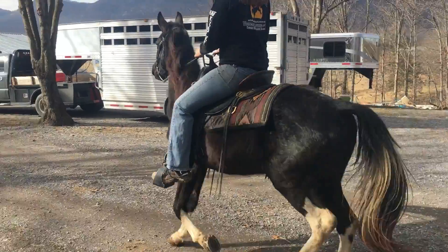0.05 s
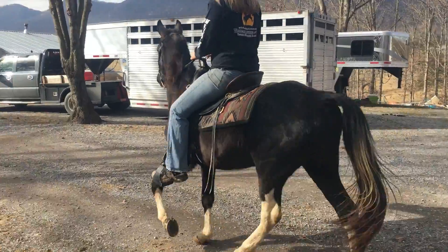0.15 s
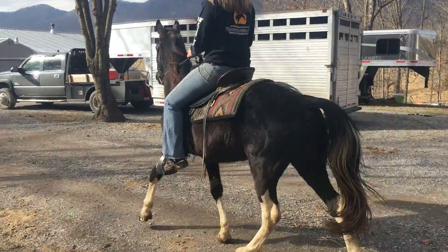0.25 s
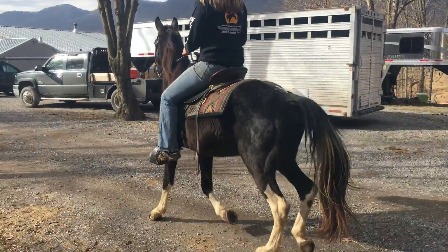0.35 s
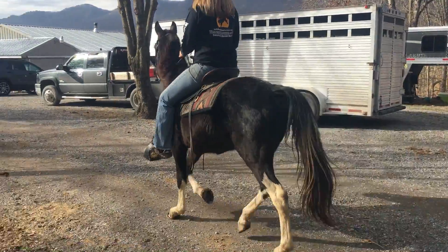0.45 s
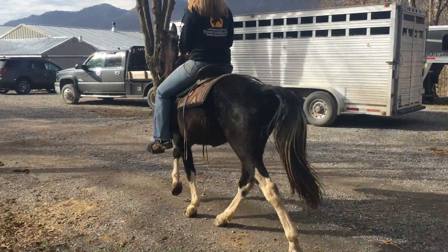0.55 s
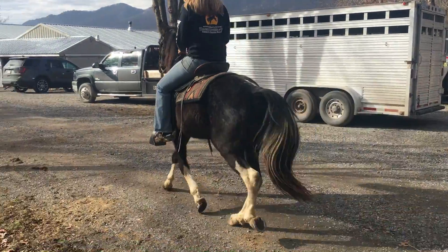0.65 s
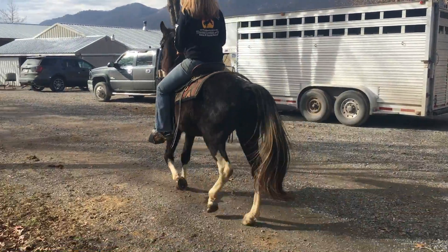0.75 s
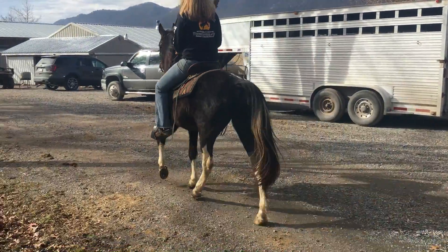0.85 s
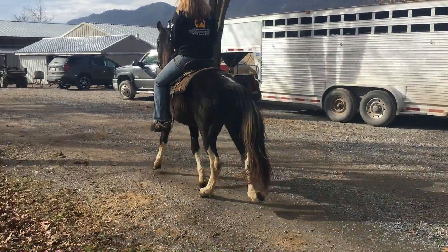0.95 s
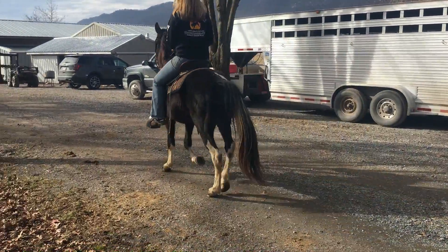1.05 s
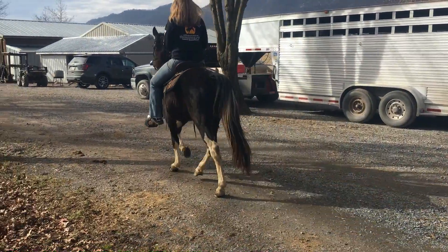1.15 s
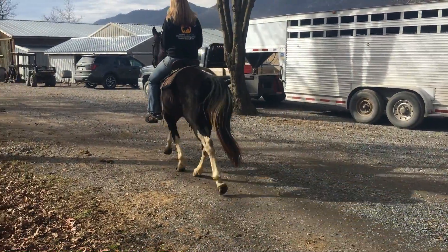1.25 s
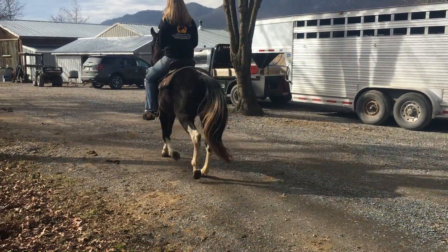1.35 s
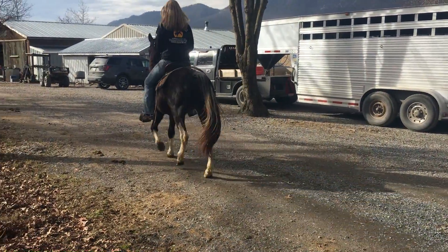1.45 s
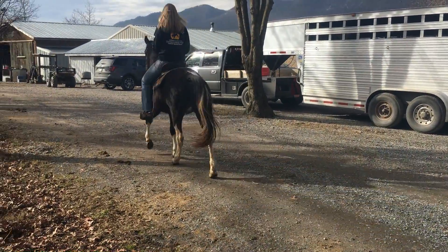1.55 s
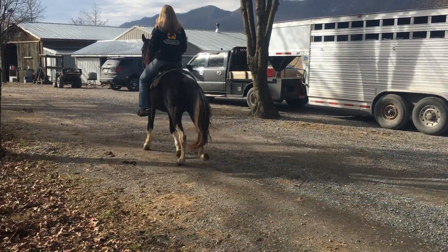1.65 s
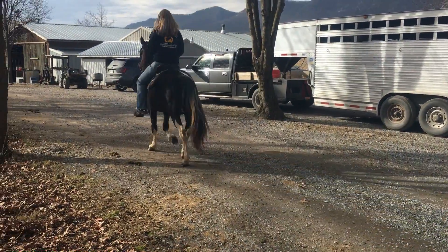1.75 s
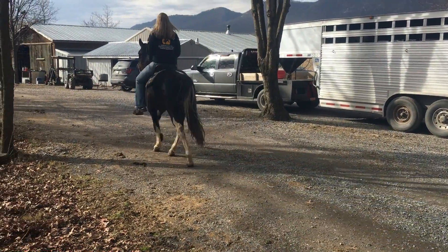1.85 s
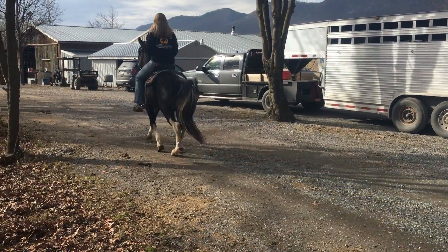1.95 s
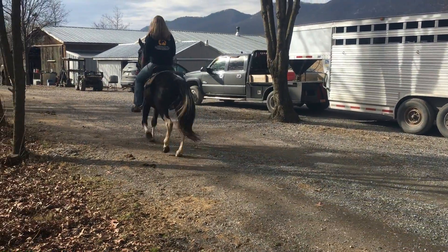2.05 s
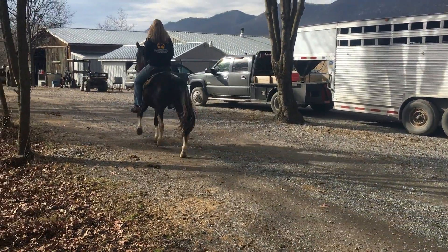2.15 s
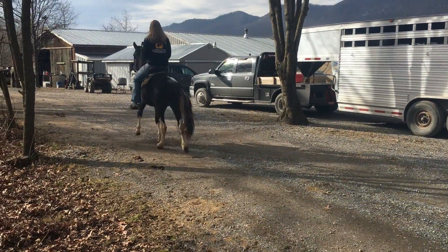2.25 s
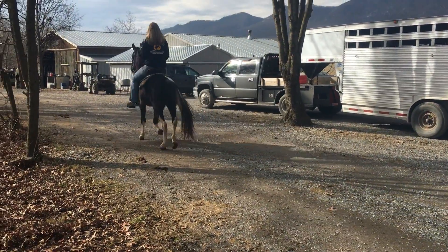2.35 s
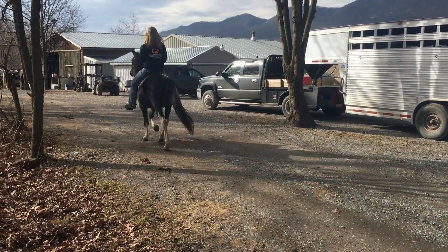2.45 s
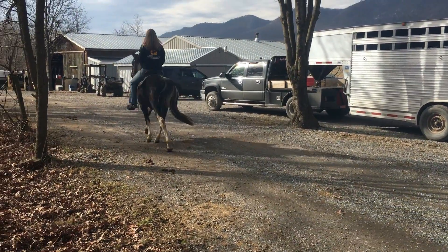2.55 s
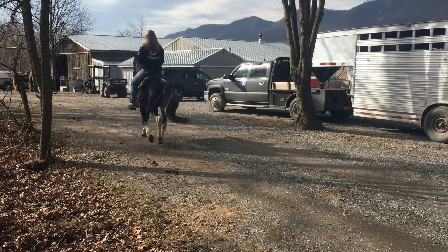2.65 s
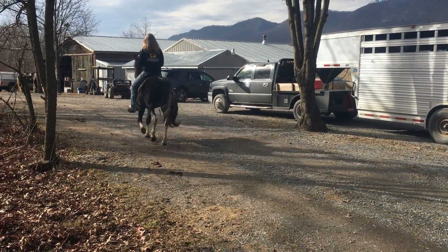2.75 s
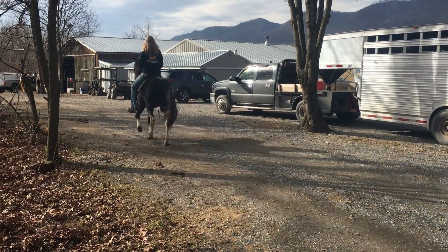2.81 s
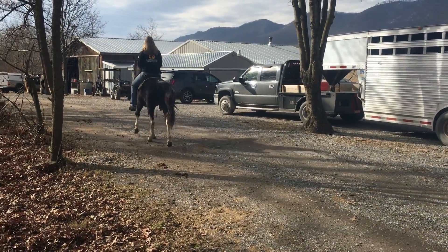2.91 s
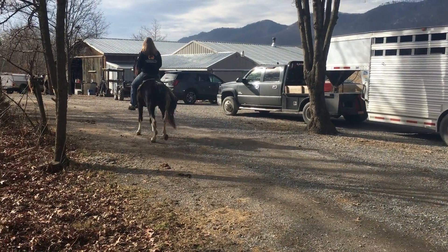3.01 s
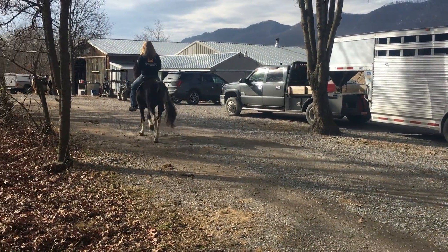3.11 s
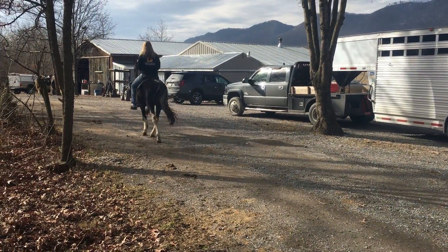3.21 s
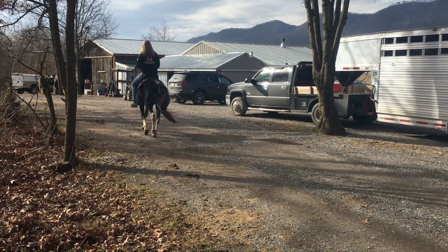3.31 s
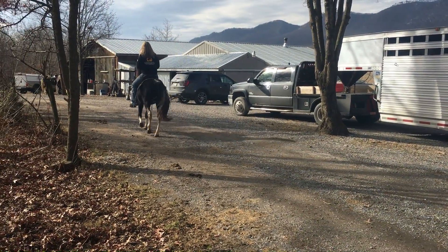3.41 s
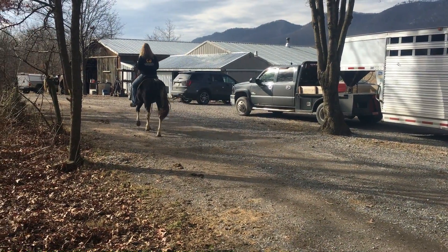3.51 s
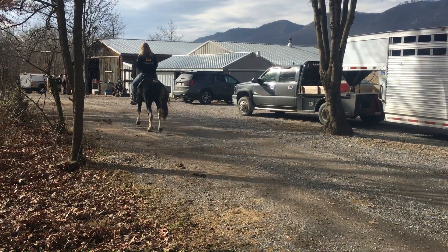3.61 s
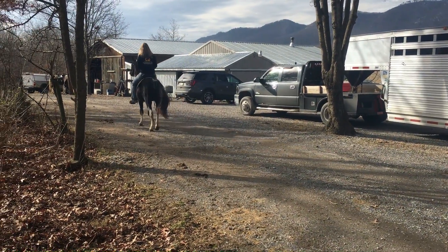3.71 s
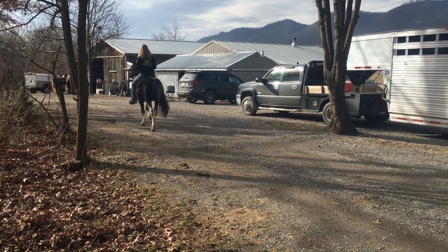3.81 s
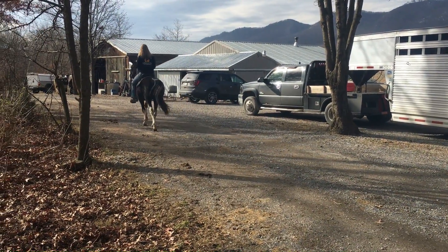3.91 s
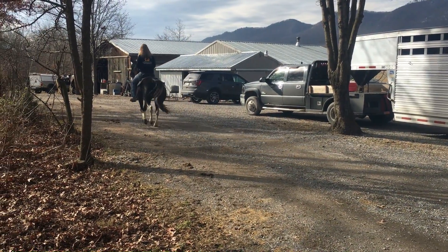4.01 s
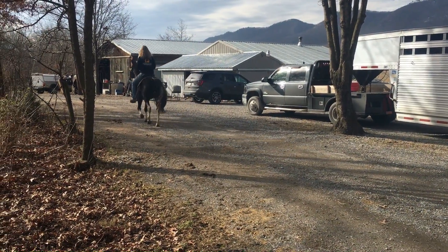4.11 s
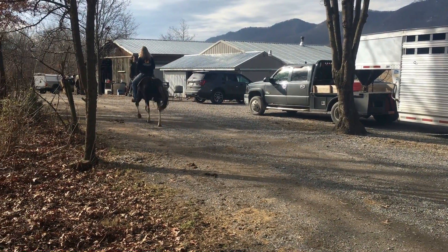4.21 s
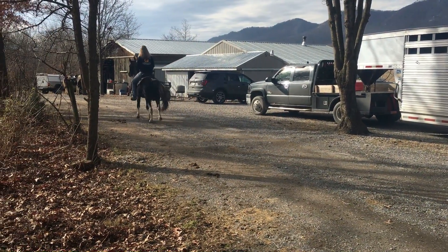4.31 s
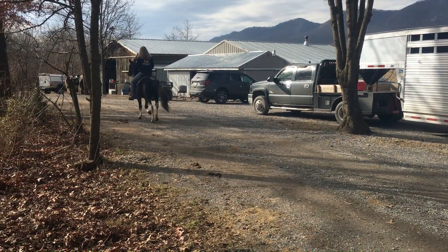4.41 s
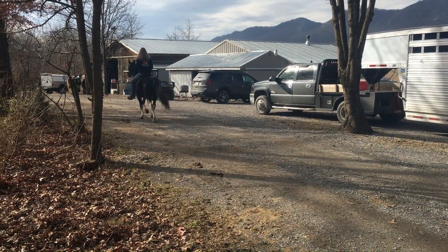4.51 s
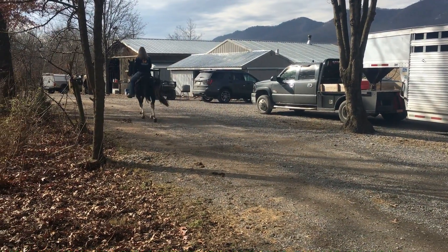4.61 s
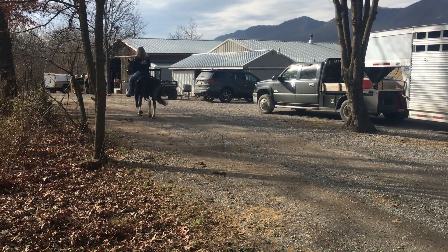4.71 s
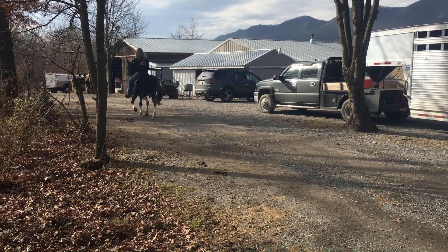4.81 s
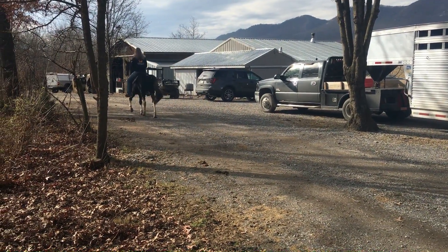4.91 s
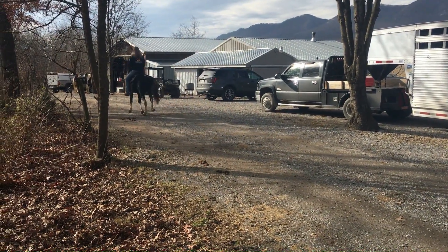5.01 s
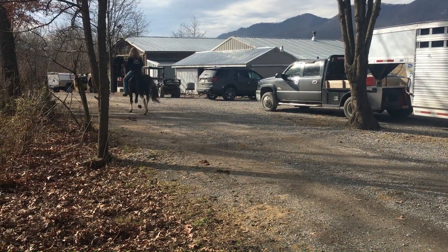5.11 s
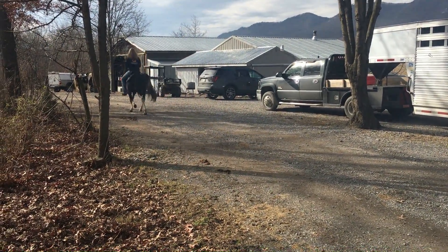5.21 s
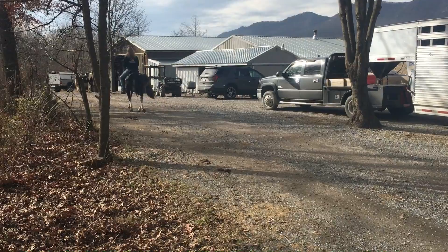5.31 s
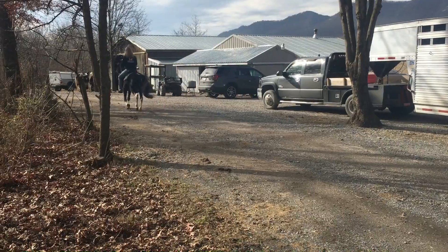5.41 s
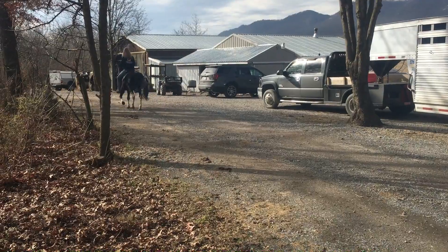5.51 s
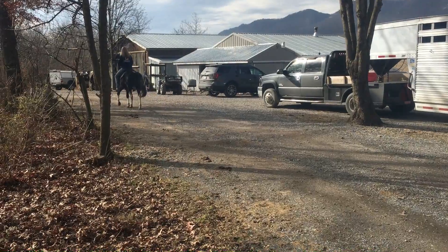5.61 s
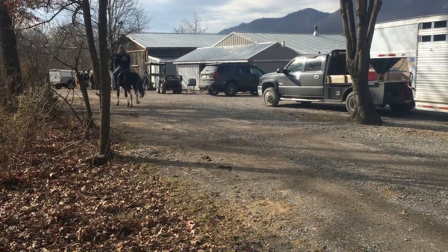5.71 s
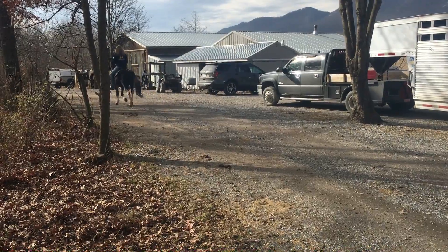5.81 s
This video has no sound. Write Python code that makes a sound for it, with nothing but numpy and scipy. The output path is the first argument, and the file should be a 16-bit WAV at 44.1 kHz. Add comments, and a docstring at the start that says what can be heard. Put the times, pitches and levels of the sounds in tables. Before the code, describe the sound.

Rapid hoof crunches on loose stones begin right beside a small stationary microphone, crisp and full of clicks and grit. Over about six seconds the horse moves off, its steps still brisk but fainter, with the treble dulled and a short scattered outdoor echo more noticeable. Some single stones still knock sharply midway. Soft airy wash and low rumble lie beneath throughout.

```python
"""A horse's hooves crush gravel as it gaits away across a yard, heard on a small microphone.
Each crunch is a dense train of stone contacts under the load of a hoof; single stones knock, snap
and tick, grit patters after them, lone specks tick thinly and the ground gives soft low thuds.
With distance the body rises in pitch and the treble dulls, while the short echo of sheds and a
trailer, made of sparse taps, gains. A noise bed of hiss, wash and low rumble lies under it all."""
import sys
import numpy as np
from scipy import signal
from scipy.io import wavfile
from scipy.ndimage import uniform_filter1d

SR = 44100
rng = np.random.default_rng(int(sys.argv[2]) if len(sys.argv) > 2 else 0)


def log_audio(samples):
    """Write samples as a 16-bit WAV file to the path given in sys.argv[1]."""
    # one column per channel
    frames = np.atleast_2d(samples).T
    # limit to full scale, then quantise
    limited = np.clip(frames, -1, 1)
    pcm = np.round(limited * 32767).astype(np.int16)
    wavfile.write(sys.argv[1], SR, pcm)


N = 258426
T = np.arange(N) / SR

# hooves crushing or dragging gravel: start_s, length_s, body_level_db, fizz_level_db
CRUNCHES = [(0.009, 0.049, -33.5, -45), (0.154, 0.023, -37.5, -50), (0.183, 0.062, -48.5, -62),
            (0.236, 0.014, -41.5, -55), (0.357, 0.034, -35.5, -44), (0.429, 0.044, -44, -59),
            (0.488, 0.0095, -29.5, -44.5), (0.528, 0.017, -58, -66), (0.592, 0.009, -54, -55),
            (0.688, 0.039, -31.5, -46), (0.768, 0.011, -47, -52), (0.819, 0.017, -40.5, -51),
            (1.032, 0.035, -40, -49), (1.113, 0.022, -44, -63), (1.152, 0.0092, -48, -69),
            (1.199, 0.017, -39, -59), (1.354, 0.043, -37, -54), (1.43, 0.037, -47, -58.5),
            (1.502, 0.016, -41.5, -52.5), (1.577, 0.015, -53.5, -73), (1.685, 0.043, -39, -51),
            (1.825, 0.016, -44, -54), (1.85, 0.0093, -47, -65), (2.015, 0.054, -40, -53.5),
            (2.103, 0.02, -42.5, -58.5), (2.139, 0.029, -43.5, -62), (2.181, 0.026, -46, -66),
            (2.26, 0.051, -57.5, -73), (2.361, 0.051, -44.5, -54.5), (2.419, 0.028, -44, -54.5),
            (2.507, 0.045, -44, -67.5), (2.681, 0.072, -43.5, -56.5), (2.762, 0.041, -56, -55),
            (2.795, 0.018, -48, -53), (2.819, 0.08, -43, -58), (3.06, 0.043, -41, -51),
            (3.112, 0.062, -49.5, -63.5), (3.17, 0.06, -43.5, -59.5), (3.374, 0.051, -41.5, -52.5),
            (3.511, 0.028, -40, -56.5), (3.722, 0.031, -40.5, -54), (3.806, 0.01, -41, -54),
            (3.849, 0.029, -47.5, -58.5), (4.061, 0.038, -44.5, -62.5), (4.187, 0.048, -49.5, -69.5),
            (4.405, 0.046, -47, -66), (4.474, 0.089, -54, -63), (4.677, 0.031, -64, -72),
            (4.759, 0.051, -47.5, -62), (4.824, 0.048, -56, -69), (4.895, 0.024, -54.5, -71),
            (4.97, 0.012, -52, -62), (5.052, 0.02, -41, -69), (5.077, 0.059, -51.5, -65),
            (5.196, 0.1, -55, -69.5), (5.442, 0.039, -43.5, -62.5), (5.564, 0.033, -50.5, -67),
            (5.795, 0.12, -49.5, -74)]
# the loudest single stones: start_s, knock_peak_db, knock_pitch_hz, snap_peak_db, tick_peak_db
CRACKS = [(0.012, -31, 895, -49, -58), (0.0237, -31, 890, -35, -40), (0.0289, -21.5, 1490, -21, -22),
          (0.0419, -26.5, 680, -17, -28), (0.0482, -21.5, 1690, -14, -35), (0.164, -27, 930, -27.5, -48),
          (0.2042, -31, 1480, -33, -51), (0.2432, -25, 1320, -30.5, -34.5), (0.311, -27.5, 900, -35, -39),
          (0.3611, -29, 1400, -45, -47), (0.3736, -29, 770, -28, -67), (0.3791, -22.5, 930, -30, -50),
          (0.4266, -29, 930, -23.5, -29.5), (0.436, -47, 980, -31, -45), (0.4538, -29, 960, -26.5, -29),
          (0.4895, -18, 900, -20, -31), (0.5274, -31.5, 724, -51, -55), (0.6924, -14.5, 1470, -46, -50),
          (0.6991, -14.5, 1070, -21, -49), (0.711, -28, 845, -34, -48), (0.7274, -41, 1090, -31, -26.5),
          (0.7693, -35, 866, -28, -40), (0.7896, -41, 730, -30, -55), (0.8125, -34, 700, -50, -61),
          (0.829, -33, 830, -31, -41), (0.8807, -38, 890, -34, -62), (0.9005, -36, 900, -40, -59),
          (0.9575, -27.5, 750, -35, -41), (1.036, -24.5, 860, -27, -40), (1.044, -23.5, 870, -35, -46),
          (1.049, -21, 950, -45, -45), (1.0867, -33, 776, -52, -43.5), (1.1628, -31, 740, -45, -39),
          (1.1692, -12.5, 1364, -13, -28.5), (1.207, -27, 865, -25, -34.5), (1.3061, -27, 917, -31.5, -37),
          (1.3643, -18, 740, -19, -33), (1.381, -43, 900, -32, -30), (1.3911, -26, 1710, -22, -27),
          (1.3952, -23.5, 1390, -27, -34), (1.4556, -45, 1300, -29.5, -49),
          (1.5119, -32.5, 1360, -30.5, -45), (1.6993, -26, 915, -33, -39), (1.7082, -27, 880, -44, -30),
          (1.8317, -19.5, 720, -37.5, -56), (2.025, -20, 1020, -41, -38), (2.041, -24, 1800, -34, -33),
          (2.0466, -23.5, 1200, -26, -42), (2.1146, -26.5, 1590, -29, -42), (2.162, -26, 1340, -37, -41),
          (2.1868, -30, 1120, -51, -57), (2.204, -30, 1020, -26.5, -35.5), (2.227, -45, 1070, -38, -44),
          (2.267, -26, 950, -31.5, -39.5), (2.368, -21, 1390, -41, -29.5), (2.3754, -25.5, 1480, -28, -34),
          (2.3939, -25.5, 1440, -46, -32), (2.409, -30.5, 1410, -48, -54), (2.4296, -41, 1280, -27.5, -55),
          (2.5163, -19.5, 1235, -34, -54), (2.677, -29, 1350, -40, -61), (2.6955, -24, 1140, -42, -38),
          (2.6999, -25.5, 1450, -49, -58), (2.7284, -29, 1590, -43, -36), (2.7695, -55, 1070, -44, -53),
          (2.8038, -26.5, 1350, -26.5, -39), (2.835, -29, 1240, -53, -54),
          (2.8563, -16.5, 1590, -18.5, -24), (3.0657, -20.5, 1510, -38, -33),
          (3.072, -17.5, 1570, -26, -30), (3.081, -24, 1310, -36, -35), (3.094, -30, 1560, -44, -50),
          (3.1398, -31.5, 1270, -41, -51), (3.1735, -30, 1420, -33, -42), (3.178, -10.5, 1240, -21.5, -43),
          (3.1917, -22, 1420, -23, -37), (3.2144, -33, 1360, -31, -39), (3.384, -27.5, 1660, -46, -55),
          (3.3983, -22, 1420, -36, -52), (3.4029, -22.5, 1430, -25, -33), (3.4686, -31, 1280, -34.5, -46),
          (3.521, -31, 1200, -30, -56), (3.7264, -26.5, 1210, -25, -35.5),
          (3.7312, -28.5, 1270, -26, -53.5), (3.792, -34, 1190, -34, -52),
          (3.8121, -32.5, 1000, -23.5, -45), (3.8637, -37, 1340, -34, -63), (4.0653, -31, 930, -34, -65),
          (4.437, -37, 1540, -31.5, -59), (4.4794, -31, 1540, -28, -69), (4.4827, -30, 1260, -35, -64),
          (4.4932, -23.5, 1385, -24.5, -64), (4.4995, -35, 1140, -23, -63), (4.5046, -33, 1770, -32, -65),
          (4.5105, -48, 1740, -31, -64), (4.5234, -46, 1400, -23.5, -48), (4.548, -38, 1264, -37, -48),
          (4.637, -57, 1220, -37.5, -63), (4.6808, -31.5, 1470, -27, -66), (4.6965, -38.5, 835, -44, -49),
          (4.768, -37, 1280, -33, -69), (4.7844, -42, 1330, -30, -65), (4.836, -41, 1320, -34.5, -62),
          (4.89, -36, 1300, -35, -65), (4.9441, -50, 1100, -38, -53), (5.039, -26, 1660, -31.5, -65),
          (5.0669, -30, 1720, -34.5, -69), (5.1067, -50, 1600, -29.5, -61), (5.117, -41, 1300, -30, -53),
          (5.2023, -42, 1530, -40.5, -60), (5.2554, -51, 1600, -32, -53), (5.4532, -30, 693, -31, -64),
          (5.474, -34, 1190, -28.5, -67), (5.5785, -24.5, 1175, -34, -64), (5.81, -50, 1630, -37, -67)]
# flung grit against the crunch that throws it, in body, snap and fizz: level_db
GRIT_LEVELS = (-18.5, -17.5, -19)
# lone specks of grit: start_s, peak_db
SPECKS = [(0.075, -48), (0.6776, -55), (1.0734, -41), (1.1303, -48), (2.562, -48), (2.6702, -48),
          (2.9275, -47), (2.9744, -51), (3.0126, -54), (3.243, -49)]
# the ground gives under a hoof: middle_s, peak_db, pitch_hz
THUDS = [(0.033, -43, 180), (0.045, -37, 378), (0.377, -40, 334), (0.494, -50, 354), (0.175, -42, 334),
         (0.378, -37, 217), (0.495, -43, 264), (0.513, -42, 84), (0.53, -45, 230), (0.714, -41, 91),
         (0.72, -32.5, 222), (0.838, -43.5, 117), (0.96, -41.5, 222), (1.049, -41.5, 193),
         (1.177, -45, 151), (1.372, -40, 174), (1.708, -38, 169), (2.047, -49, 312), (2.544, -41.5, 69.5),
         (2.725, -41, 220), (3.192, -44, 129), (3.389, -42, 206), (3.417, -38.5, 210), (4.074, -43, 112),
         (4.714, -40, 99), (4.779, -43, 173), (5.755, -41.5, 110)]
# colour of colliding stones close to the microphone: frequency_hz, level_db
GRAVEL_NEAR = [(180, -36.5), (300, -2.5), (478, -12.5), (1010, 3.5), (1150, -12.5), (1660, -6), (1970, -11),
               (2740, -7), (3130, -2), (3520, -15.5), (4910, -25.5), (6520, -27.5), (8360, -49),
               (9550, -44), (13000, -55), (16000, -71)]
# farther off the ground reflection lifts the body in pitch and the treble dulls: frequency_hz, level_db
GRAVEL_FAR = [(180, -38.5), (300, -21), (418, -20.5), (678, -4.5), (1010, -3.5), (1250, 2.5), (1640, -4.5),
              (2030, -19.5), (2980, -9), (3700, -28), (6200, -35), (8940, -51.5), (16000, -52)]
# the horse moves off: time_s, far_colour_share (0-1)
FARNESS = [(0, 0.01), (1.5, 0.46), (2.5, 0.57), (3.5, 1), (5.86, 0.98)]
# borders of body, snap, fizz and sparkle: frequency_hz
SPLITS_HZ = (2136, 3730, 8300)
# dying away of the yard's echo: frequency_hz, t60_s
ECHO_T60 = [(300, 1), (1200, 0.5), (3000, 0.47), (6000, 0.81), (12000, 0.5)]
# the echo gains on the direct sound with distance: time_s, level_db
ECHO_LEVEL = [(0, -19.5), (3, -16.5), (5.86, -10)]
# colour of the steady background: frequency_hz, relative level_db
AIR_COLOUR = [(15, -75), (25, 10.5), (58, 7), (134, 0.5), (463, -13), (659, -9.5), (1290, -9.5),
              (1700, -12.5), (2110, -18.5), (2690, -24.5), (2990, -9), (4610, -33), (10400, -40),
              (14800, -41), (16000, -52)]
# colour of the low rumble: frequency_hz, relative level_db
RUMBLE_COLOUR = [(20, -5.5), (40, -43), (65, -1.5), (115, -11), (136, 3.5), (155, -7), (200, -4),
                 (300, -19.5), (600, -74)]
# the rumble swells and sags: time_s, level_db
RUMBLE_LEVEL = [(0.0, -53), (0.98, -53), (1.29, -54.5), (2.46, -55), (2.58, -53), (3.51, -54.5),
                (4.02, -58), (5.86, -59)]

SNAP_SHARE, SNAP_DB, SNAP_FAR_DB = 0.38, -1.5, 5.5  # snap lies between body and fizz, stands out from afar
SPARKLE_DB, SPARKLE_FAR_DB = -16, -3.5  # top band against the fizz, and its loss from afar
SHARED = 0.58  # power share of stone contacts that strike all bands at once
RING_MS = 1.76  # time for a knock to fall to 1/e
KNOCK_LOW_HZ = 445  # single stones are too small to sound below this
SPECK_HZ = 5730
THUD_S, THUD_CYCLES = 0.008, 1.4  # half length of a thud: a fixed part plus some cycles of its pitch
AIR_DB = -54  # steady background level
EDGE_HZ = 15960  # top of the microphone's band


def crunches(near, far):
    """Dense stone contacts under each hoof give way in jerks; from afar their ends blur."""
    jerks = gain_of(2.2 * drift(120))
    trains = grains(1800, 4.5)
    loaded = [train * jerks * pressure(band, 0.0018, 0.0044) for band, train in enumerate(trains)]
    return sounded(loaded, near, far)


def pressure(band, settle_s, blur_s):
    """Load of the hooves on the stones: quick rise, sagging hold, then settling."""
    out = np.zeros(N)
    for start_s, length_s, body_db, fizz_db in CRUNCHES:
        t = np.arange(0, length_s + 0.53, 1 / SR)
        away = farness(start_s)
        rise = np.minimum(t / 0.0067, 1)
        sag_db = -4.5 * (t / max(length_s, 0.004)).clip(0, 1)
        settling = np.exp(-(t - length_s).clip(0) / (settle_s + blur_s * away))
        snap_db = body_db + SNAP_SHARE * (fizz_db - body_db) + SNAP_DB + SNAP_FAR_DB * away
        level_db = (body_db, snap_db, fizz_db)[band]
        add(out, start_s, gain_of(level_db + sag_db) * rise * settling)
    return out


def grains(per_s, spread_db):
    """Trains of stone contacts for body, snap and fizz, a few large; part of them strike all three."""
    struck = rng.exponential(1, (N, 4))
    size = gain_of(spread_db * np.minimum(struck, 4)) * (rng.random((N, 4)) < per_s / SR)
    kind = rng.integers(0, 6, (N, 4))
    # each kind of stone has its own colour: a noise burst with a 0.55 ms decay
    shapes = rng.standard_normal((6, 60)) * np.exp(-np.arange(60) / SR / 0.00055)
    trains = sum(signal.oaconvolve(size * (kind == k), shape[:, None], axes=0)[:N]
                 for k, shape in enumerate(shapes))
    *own, common = trains.T
    return [unit_rms(np.sqrt(SHARED) * common + np.sqrt(1 - SHARED) * train) for train in own]


def cracks(near, far):
    """A stone slips and strikes: a dull knock at its own pitch, a snap and a tick."""
    out, t = np.zeros(N), np.arange(900) / SR
    chance = rng.standard_normal((len(CRACKS), 4, 250))
    small = signal.butter(2, KNOCK_LOW_HZ, "high", fs=SR, output="sos")
    # rise and fade in seconds for body, snap, fizz and sparkle
    times = (0.00035, 0.0009), (0.00008, 0.00095), (0.000062, 0.0016), (0.00014, 0.0013)
    chatter = [(1 - np.exp(-t[:250] / rise)) * np.exp(-t[:250] / fade) for rise, fade in times]
    for (start_s, knock_db, hz, snap_db, tick_db), contact in zip(CRACKS, chance * chatter):
        bands = near + farness(start_s) * (far - near)
        # the pitch sags as the contact softens
        cycles = hz * (t + 0.061 * 0.00088 * (1 - np.exp(-t / 0.00031)))
        ring = np.sin(2 * np.pi * cycles) * np.exp(-1000 * t / RING_MS) * (1 - np.exp(-t / 0.00073))
        rattle, snap, tick, spark = (np.convolve(c, band[:900])[:900] for c, band in zip(contact, bands))
        knock = unit_rms(ring) + 0.6 * unit_rms(signal.sosfilt(small, rattle))
        spark_db = tick_db - 4.0 + sparkle_db(start_s)
        for part, db in ((knock, knock_db), (snap, snap_db), (tick, tick_db), (spark, spark_db)):
            add(out, start_s, gain_of(db) * part / abs(part).max())
    return out


def grit(near, far):
    """Small stones thrown by each hoof patter down in clumps after it."""
    clumps = gain_of(6.5 * drift(300))
    thrown = [gain_of(db) * uniform_filter1d(pressure(band, 0.071, 0.0026), 600)
              for band, db in enumerate(GRIT_LEVELS)]
    trains = grains(600, 4.1)
    return sounded([train * load * clumps for train, load in zip(trains, thrown)], near, far)


def specks():
    """Lone specks tick for about a millisecond: a roughened tone with a fast rise and fade."""
    out, t = np.zeros(N), np.arange(200) / SR
    for (start_s, db), rough in zip(SPECKS, rng.standard_normal((len(SPECKS), 200))):
        tone = np.sin(2 * np.pi * SPECK_HZ * t) + 0.08 * np.diff(rough, prepend=0)
        tick = tone * t * np.exp(-t / 0.00015)
        add(out, start_s, gain_of(db) * tick / abs(tick).max())
    return out


def thuds():
    """The ground gives under a hoof: soft low bumps of a few cycles."""
    out = np.zeros(N)
    for (middle_s, db, hz), phase in zip(THUDS, rng.random(len(THUDS))):
        half = THUD_S + THUD_CYCLES / hz
        t = np.arange(-half, half, 1 / SR)
        bump = np.hanning(len(t)) * np.cos(2 * np.pi * (hz * t + phase))
        add(out, max(middle_s - half, 0), gain_of(db) * bump)
    return out


def yard(hooves):
    """Echo of the sheds and trailer: sparse taps of random sign, each band dying at its own speed."""
    taps = np.zeros(SR // 2)
    at = np.arange(200, len(taps) - 20, 20)
    taps[at + rng.integers(0, 20, len(at))] = rng.choice([-1., 1.], len(at))
    hz, t, spectra = signal.stft(taps, SR, nperseg=256)
    t60 = read(ECHO_T60, hz)[:, None].clip(0.03)
    tail = signal.istft(spectra * gain_of(-60 * t / t60), SR, nperseg=256)[1]
    sent = hooves * gain_of(np.interp(T, *np.transpose(ECHO_LEVEL)))
    return signal.fftconvolve(sent, tail / np.linalg.norm(tail))[:N]


def background():
    """Steady hiss and wash, and a lumpy low rumble, both of shaped noise."""
    rumble = noise(RUMBLE_COLOUR, 0.5) * gain_of(np.interp(T, *np.transpose(RUMBLE_LEVEL)))
    return gain_of(AIR_DB) * noise(AIR_COLOUR, 4.2) + rumble


def noise(colour, patchy_db):
    """Random short-time spectra with drifting patches that even out in the treble."""
    real, imag, patches = rng.standard_normal((N // 1024 + 5, 2049, 3)).T
    patches = unit_rms(uniform_filter1d(uniform_filter1d(patches, 14, 0), 3, 1))
    hz = np.fft.rfftfreq(4096, 1 / SR)[:, None]
    level_db = read(colour, hz) + patchy_db * patches / (1 + hz / 3000)
    spectra = (real + 1j * imag) * gain_of(level_db)
    return unit_rms(signal.istft(spectra, nperseg=4096, noverlap=3072)[1][:N])


def sounded(trains, near, far):
    """Contact trains heard through the near and far colours, crossfaded in power with distance."""
    share = farness(T)
    trains = [*trains, trains[2] * gain_of(sparkle_db(T))]  # sparkle rides on the fizz
    out = np.zeros(N)
    for train, near_band, far_band in zip(trains, near, far):
        out += signal.oaconvolve(train * np.sqrt(1 - share), near_band)[:N]
        out += signal.oaconvolve(train * np.sqrt(share), far_band)[:N]
    return out


def farness(t):
    """Share of the far colour at time t."""
    return np.interp(t, *np.transpose(FARNESS)).clip(0, 1)


def sparkle_db(t):
    """Top band against the fizz at time t."""
    return SPARKLE_DB + SPARKLE_FAR_DB * farness(t)


def gravel_bands(colour):
    """A gravel colour cut into body, snap, fizz and sparkle filters."""
    hz = np.fft.rfftfreq(4096, 1 / SR) + 1
    below = [-10 * np.log10(1 + (hz / f) ** 24) for f in SPLITS_HZ] + [0]
    above = [0] + [-10 * np.log10(1 + (f / hz) ** 12) for f in SPLITS_HZ]
    port_db = 2.3 / (1 + ((hz - 3150) / 160) ** 2)  # narrow resonance of the microphone port
    return np.array([causal(read(colour, hz) + port_db + a + b) for a, b in zip(above, below)])


def causal(db):
    """Minimum-phase impulse response with the given gain on a 4096-point frequency grid, energy 1."""
    both_sides = np.r_[db, db[-2:0:-1]]
    log_gain = np.log(gain_of(np.maximum(both_sides, db.max() - 90)))
    taps = np.fft.ifft(np.exp(np.conj(signal.hilbert(log_gain)))).real[:1500]
    return taps / np.linalg.norm(taps)


def drift(width):
    """Slow random wander of unit RMS: noise averaged twice over a width in samples."""
    return unit_rms(uniform_filter1d(uniform_filter1d(rng.standard_normal(N), width), width))


def gain_of(db):
    """Amplitude factor of a level in dB."""
    return 10 ** (np.asarray(db) / 20)


def unit_rms(x):
    """Scale to an RMS of 1."""
    return x / np.sqrt(np.mean(x ** 2) + 1e-20)


def read(points, hz):
    """Read a curve between its points on a logarithmic frequency axis."""
    f, value = np.transpose(points)
    return np.interp(np.log(hz + 1), np.log(f + 1), value)


def add(mix, start_s, sound):
    """Lay a sound into the mix, cut off at the end."""
    part = mix[round(start_s * SR):][:len(sound)]
    part += sound[:len(part)]


def scene():
    """Hooves on gravel with their echo, thuds in the ground, over the background."""
    near, far = gravel_bands(GRAVEL_NEAR), gravel_bands(GRAVEL_FAR)
    hooves = crunches(near, far) + cracks(near, far) + grit(near, far) + specks()
    return (hooves + thuds() + yard(hooves) + background())[None]


def record(dry):
    """The small microphone drops the deepest bass; a steep low-pass then limits the band."""
    dry = signal.sosfilt(signal.butter(3, 42, "high", fs=SR, output="sos"), dry)
    low_pass = signal.firwin(511, EDGE_HZ, window=("kaiser", 9), fs=SR)
    return signal.oaconvolve(dry, low_pass[None], "same")


dry = scene()
out = record(dry)
log_audio(out)
```